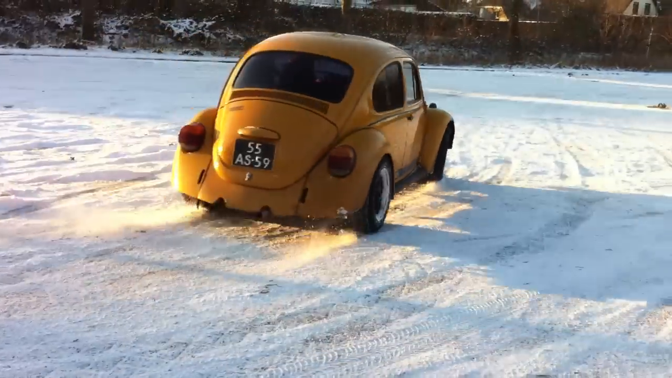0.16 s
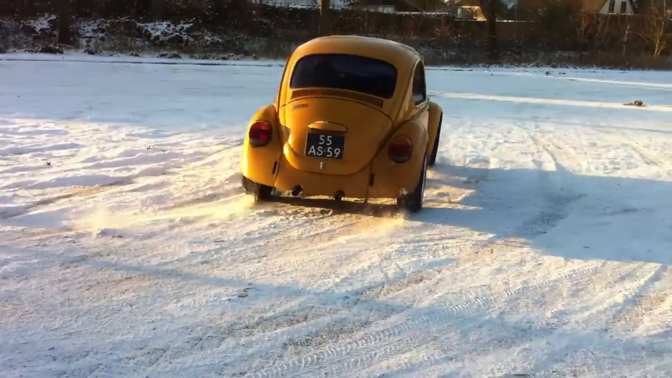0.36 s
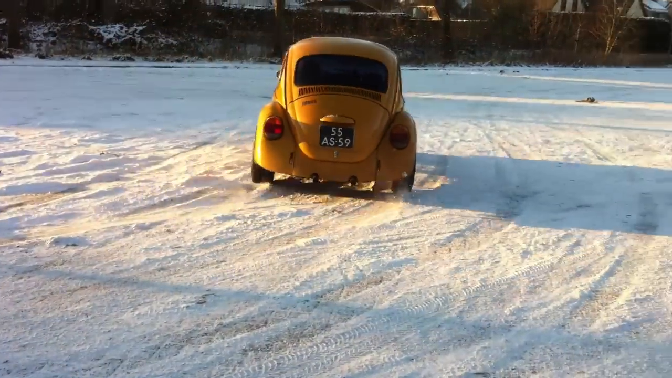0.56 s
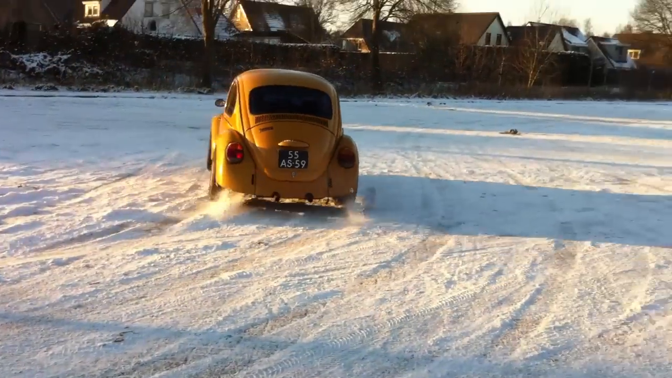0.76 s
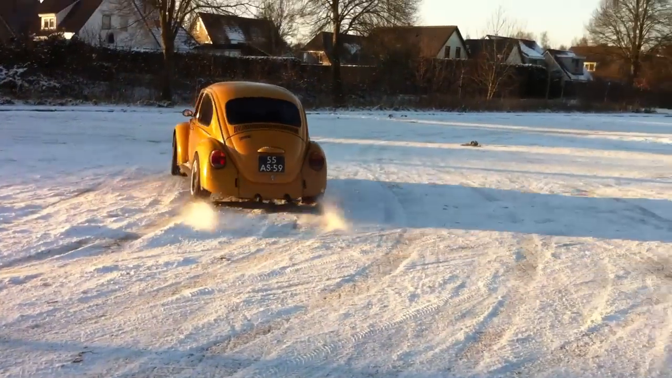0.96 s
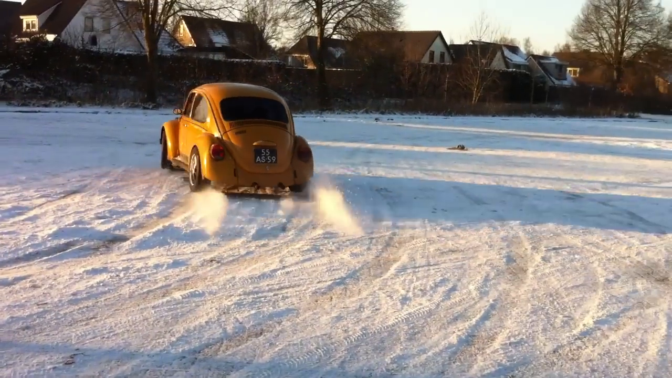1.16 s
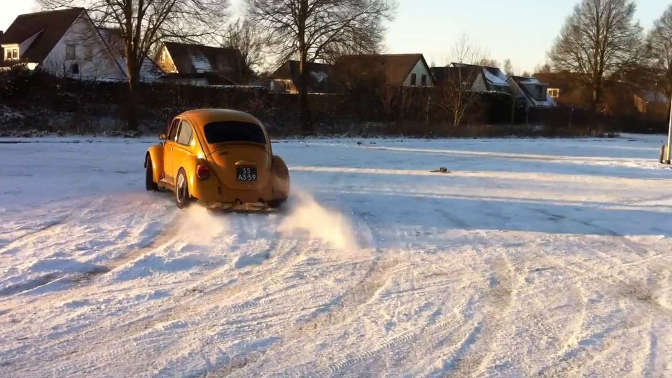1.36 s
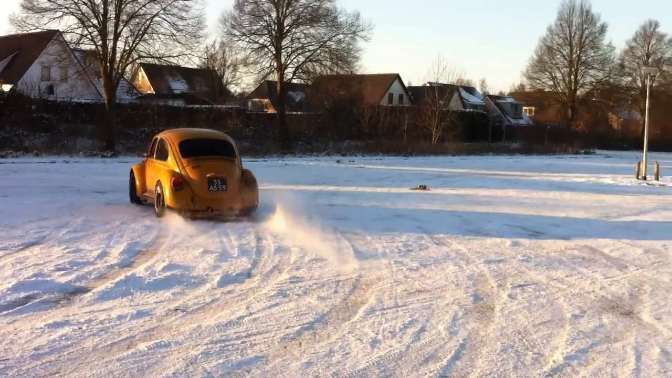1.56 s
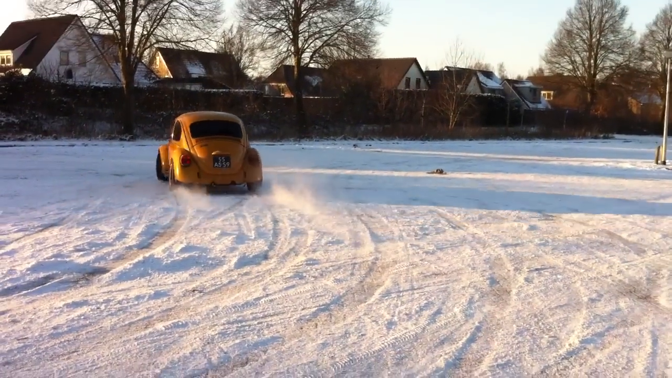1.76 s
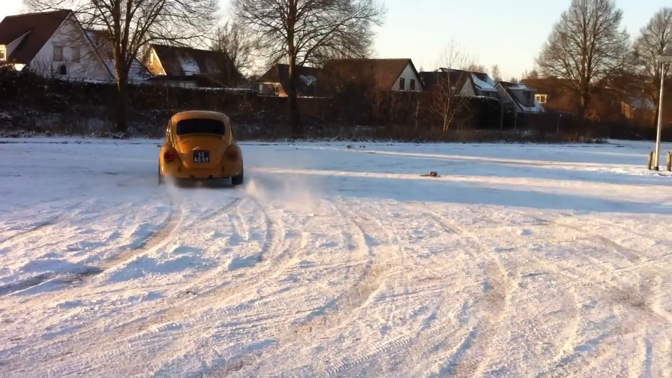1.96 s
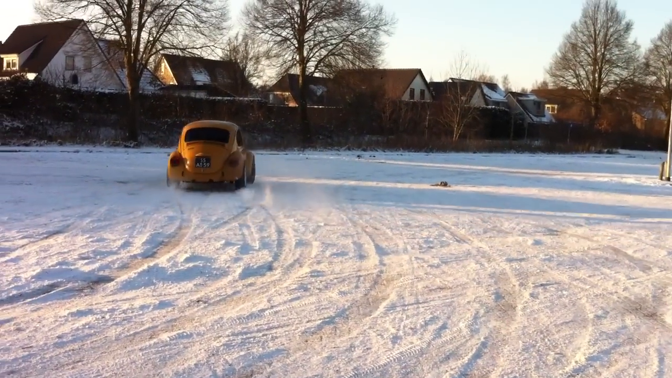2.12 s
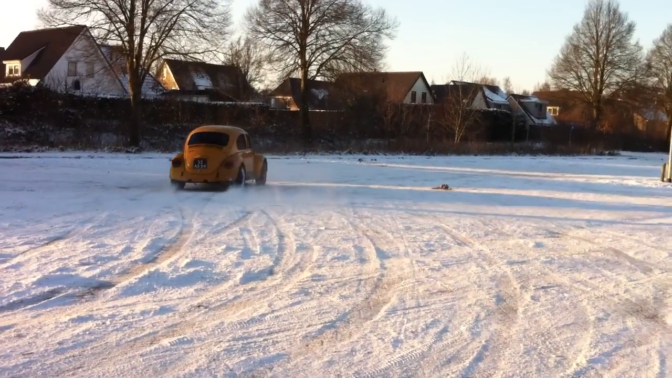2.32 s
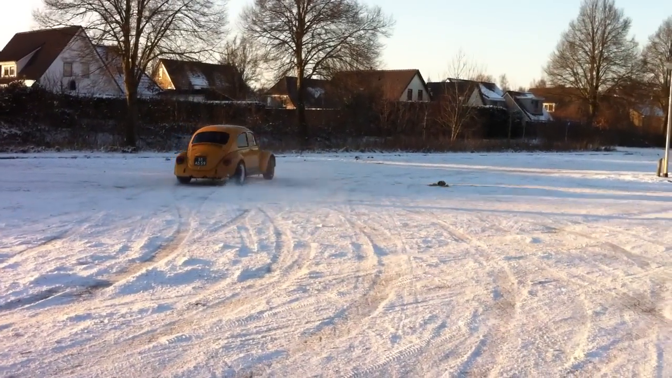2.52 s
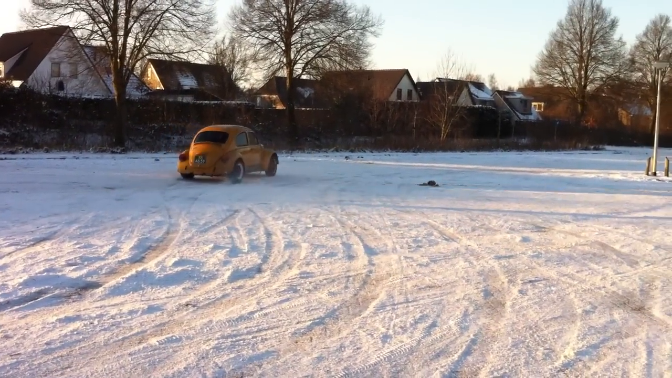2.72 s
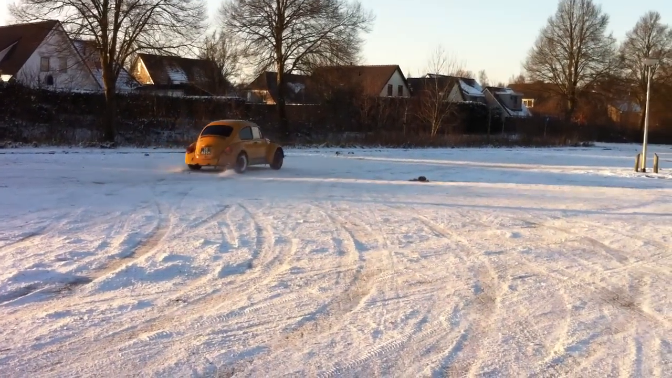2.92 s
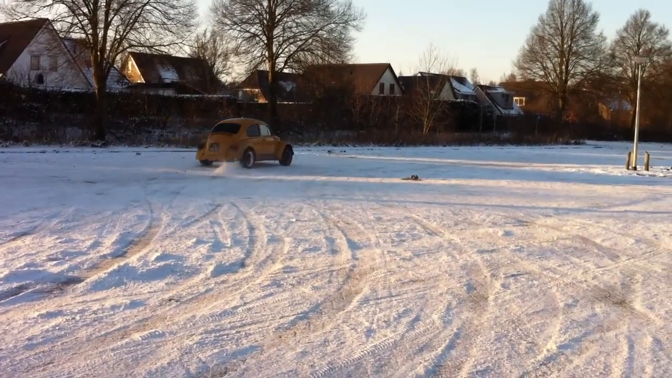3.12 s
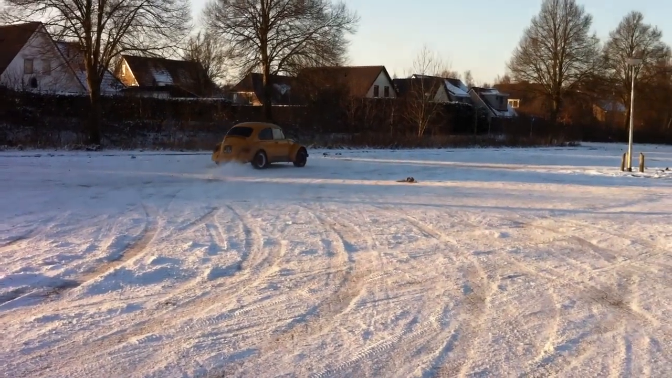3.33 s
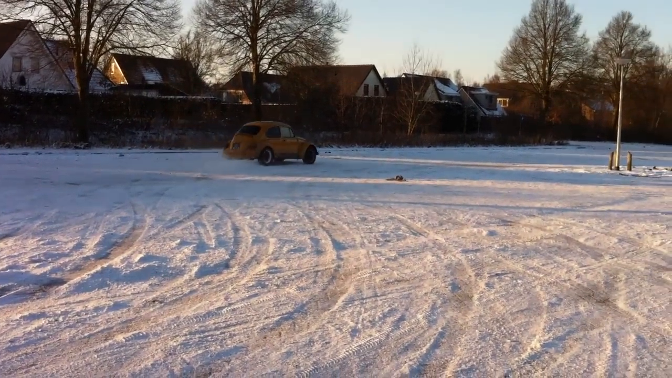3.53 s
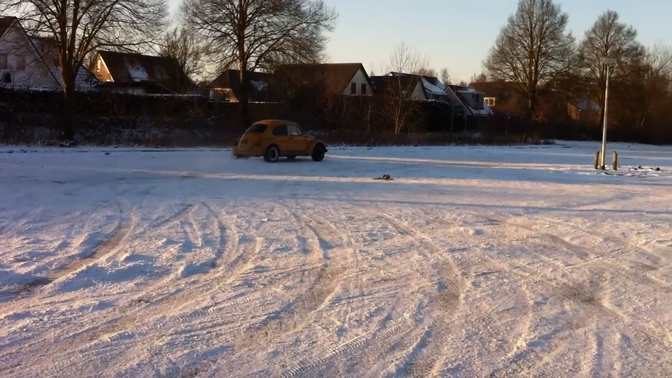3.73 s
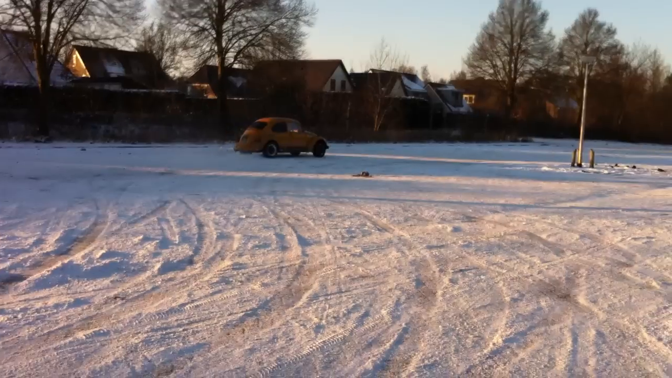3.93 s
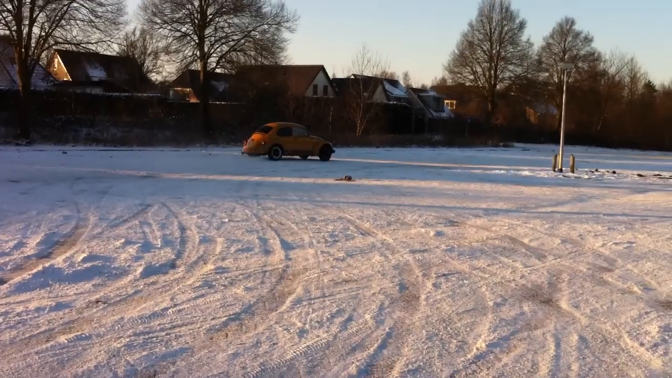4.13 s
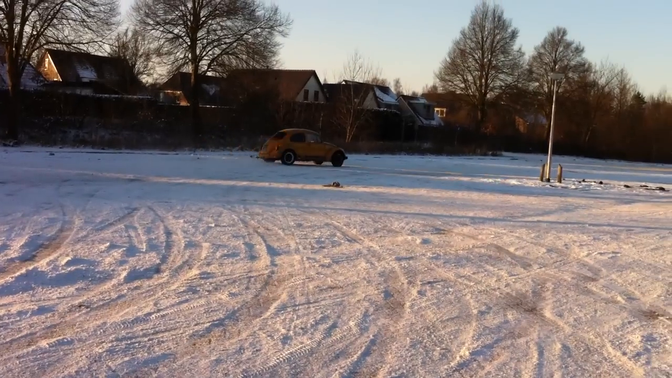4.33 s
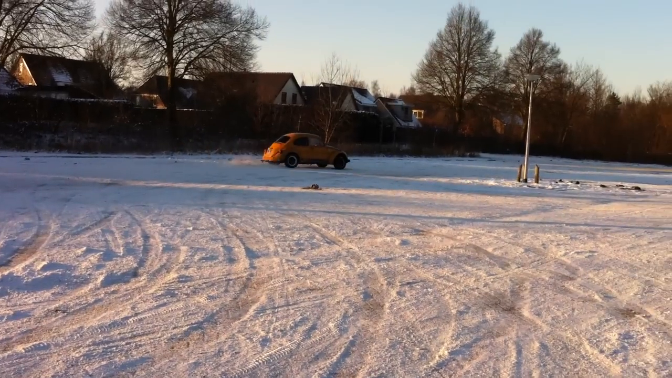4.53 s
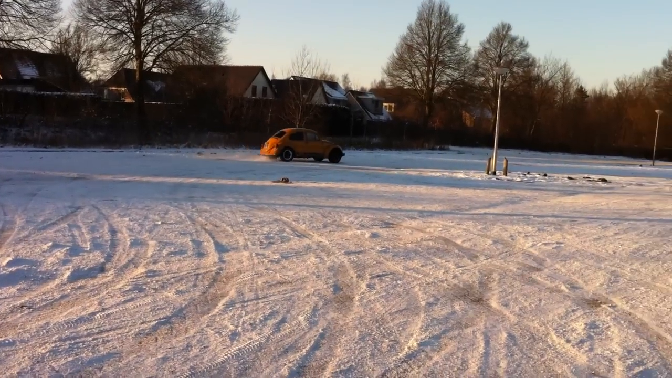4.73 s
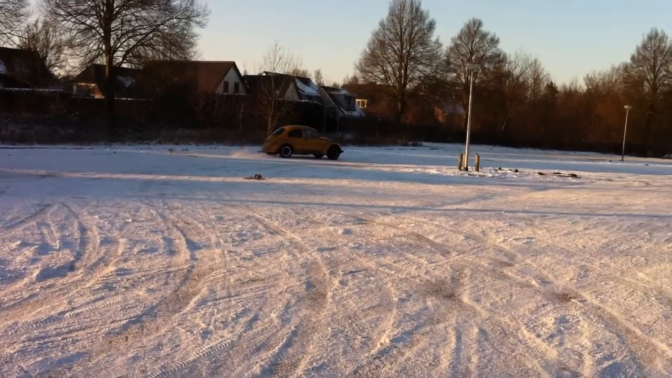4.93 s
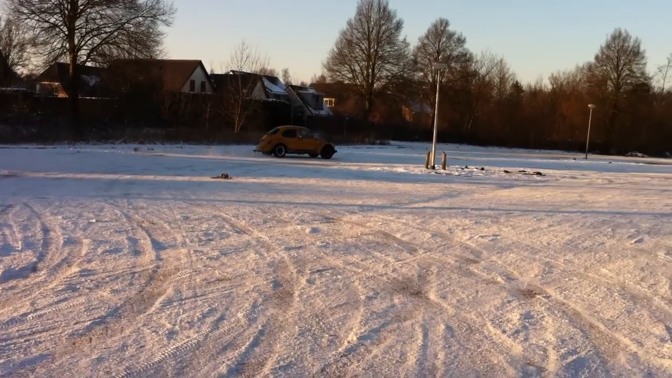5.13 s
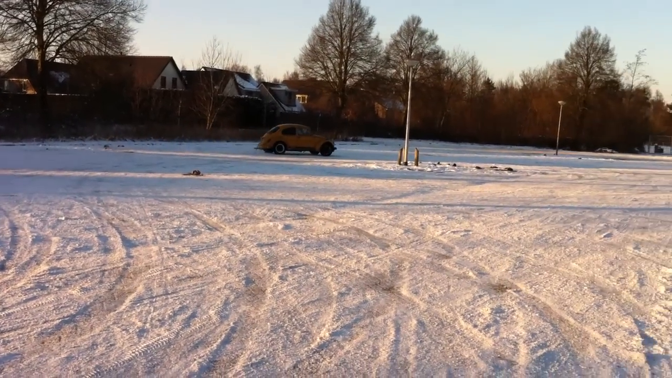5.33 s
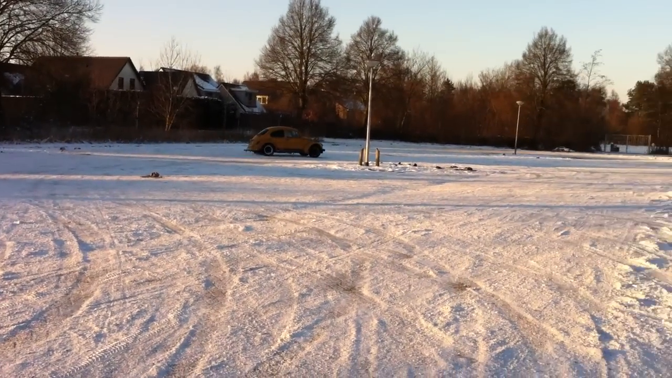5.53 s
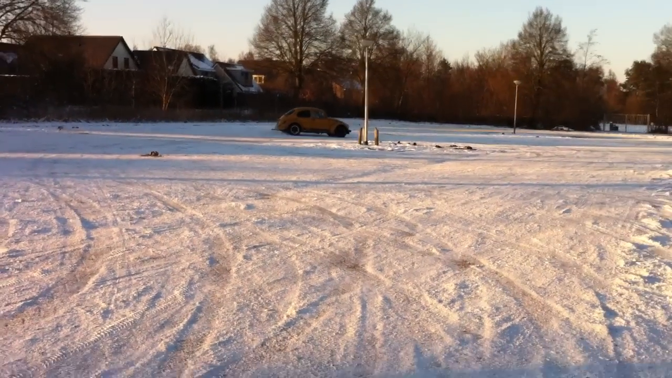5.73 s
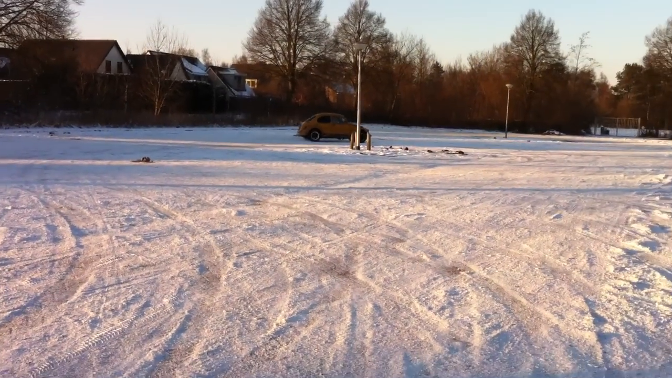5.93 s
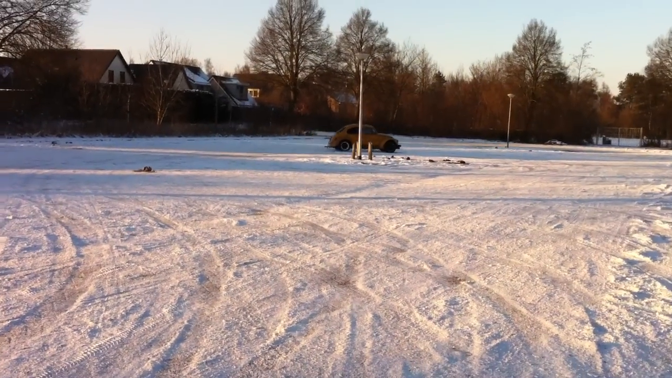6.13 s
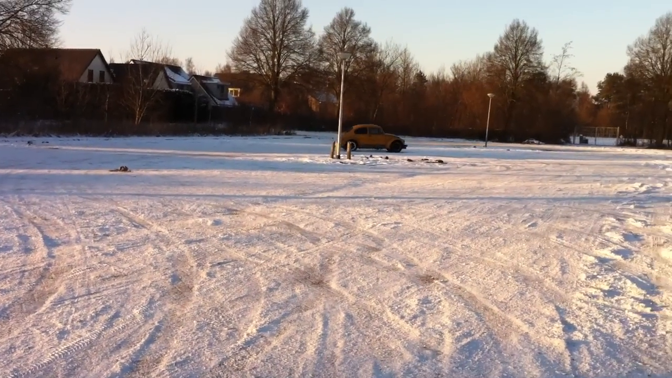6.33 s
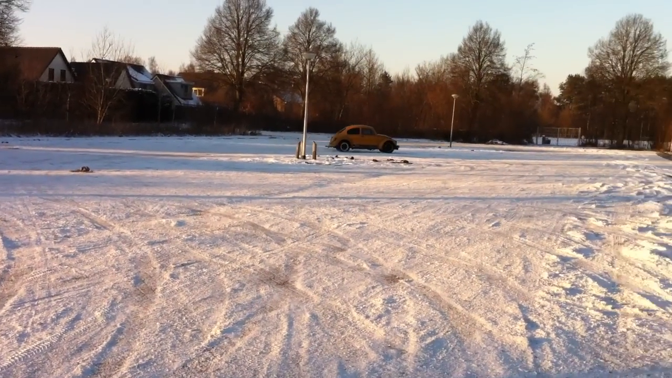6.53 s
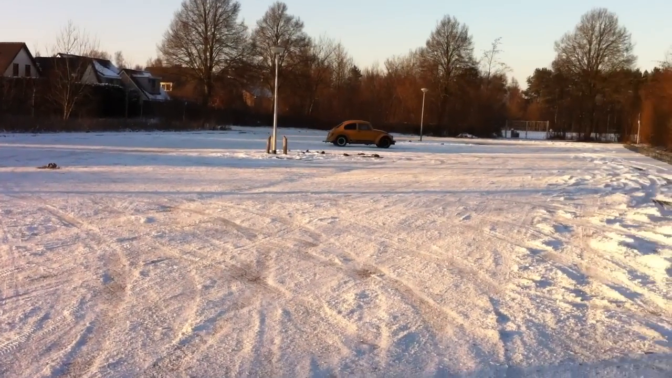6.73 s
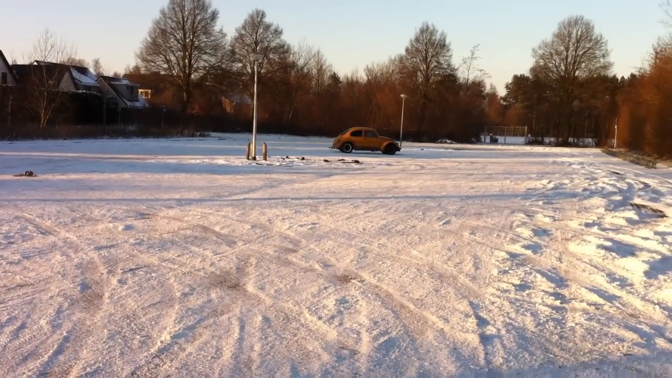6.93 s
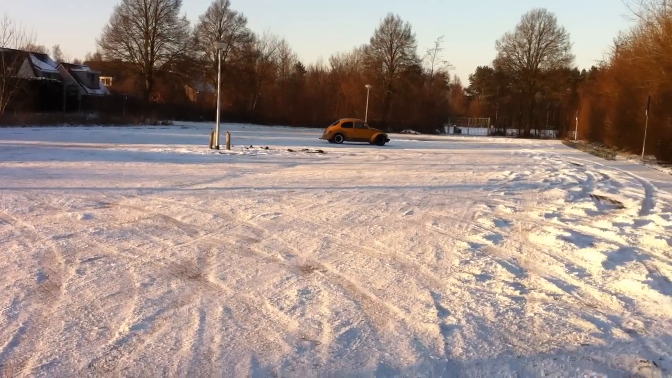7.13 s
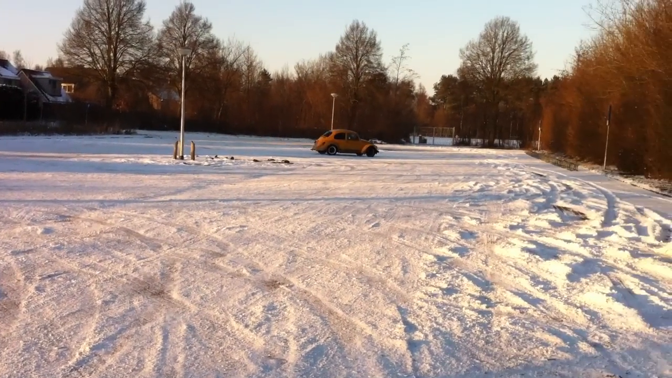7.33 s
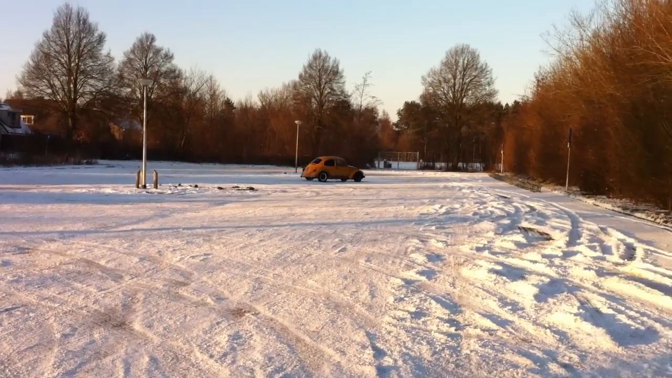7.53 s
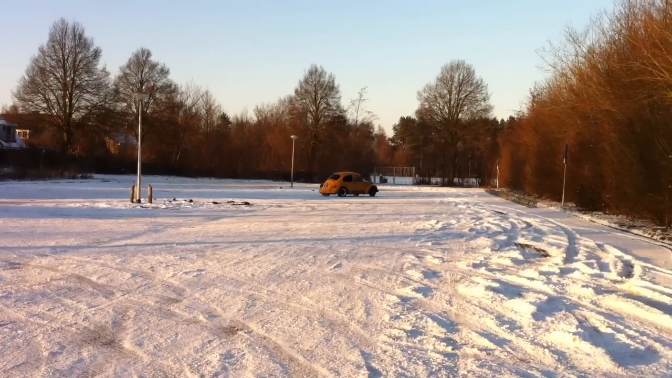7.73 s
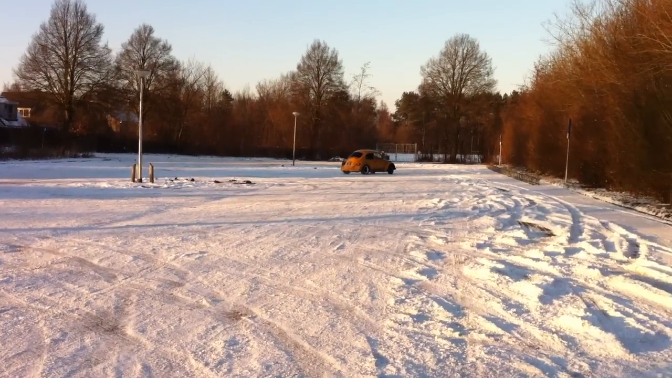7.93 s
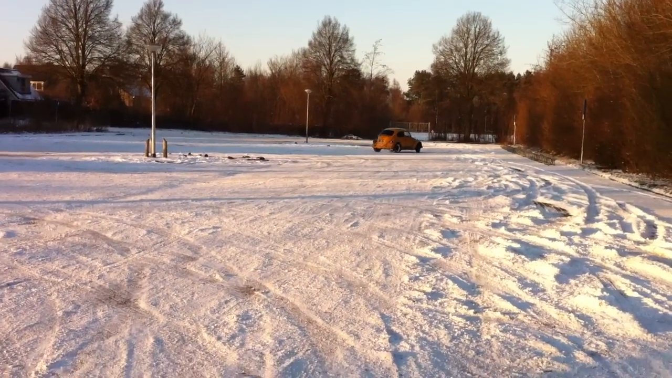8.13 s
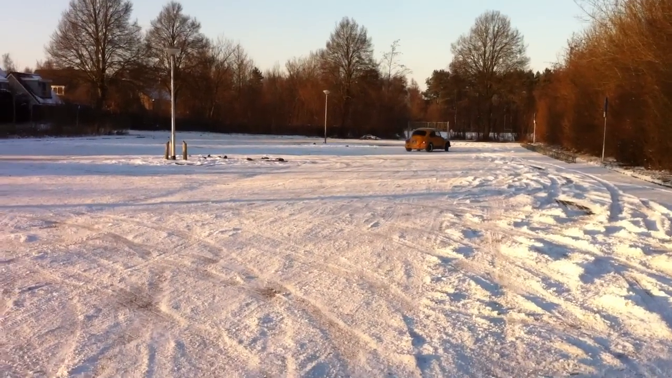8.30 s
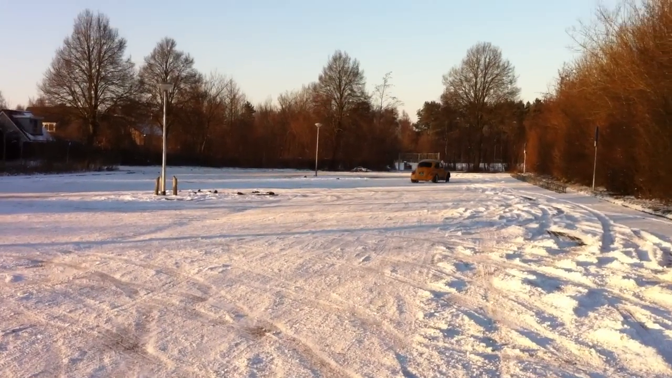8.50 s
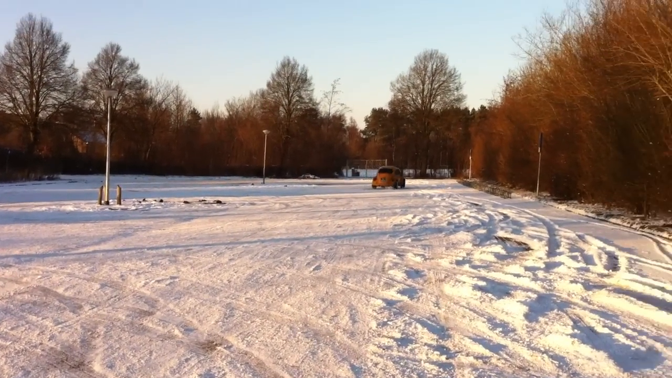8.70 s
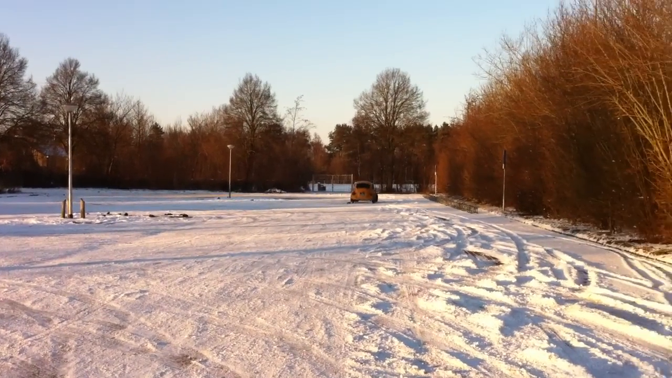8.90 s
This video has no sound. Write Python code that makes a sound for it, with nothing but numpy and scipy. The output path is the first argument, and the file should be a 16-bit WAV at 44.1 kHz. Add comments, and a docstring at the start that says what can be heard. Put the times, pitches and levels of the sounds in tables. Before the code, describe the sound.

An old air-cooled four-cylinder car begins very close, bright snow-tearing tyre noise fading within the first second as its revs fall. At about 0.7 s an intake gulp starts a raspy surge, held until 1.3; the revs dip and surge again from 1.5 to 2.1 with sharp exhaust cracks near 1.6. They sink to a low, lumpy beat around 2.7, then climb hard to 3.6. A lift burbles at 3.8, a blip peaks at 4.3, another burble follows, and a longer pull peaks near 5.5. Now distant and duller, the engine slides down from 6 to a faint low purr by 6.8. Close knocks sound at 7.15, 7.3 and 8.1, with small rustles and faint metallic valve ticks at 8.2-8.6. From 8.6 it revs up again amid snow swish, thin whistling bands and rustles, ending mid-rise at 9. Faint echoes from walls, soft air hiss throughout.

```python
"""An old air-cooled flat-four car starts close by, its tyres tearing snow, and slides away over a snowy car park.
It revs up and down: exhaust orders hum, gas noise rasps, clatters and spits at each firing, and walls echo it.
Early on the intake gulps as the foot goes down, single firings crack and lifting the foot burbles in the pipe.
Farther off it drops to low revs; snow swish and whistling bands come and go, damped rings knock and noise
rustles near the phone, faint engine valve ticks ring and the car revs up again. Air hisses throughout."""
import sys
import numpy as np
from scipy import signal
from scipy.fft import rfft, irfft, next_fast_len
from scipy.io import wavfile
from scipy.ndimage import uniform_filter1d

SR = 44100
rng = np.random.default_rng(int(sys.argv[2]) if len(sys.argv) > 2 else 0)


def convert_level_to_amplitude(level_db):
    """Map a level in decibels to its linear amplitude factor."""
    exponent = np.asarray(level_db, float) / 20
    return 10 ** exponent


def store_wav(level_fs):
    """Save 16-bit WAV to argv[1]."""
    pcm = np.round(np.clip(np.atleast_2d(level_fs), -1, 1) * 32767)
    wavfile.write(sys.argv[1], SR, pcm.T.astype(np.int16))


N = 399546
T = np.arange(N) / SR
STEP = 64  # samples between control points
TC = T[::STEP]
NEAR_M, MID_HZ = 10, 100  # distance and firing rate at which the layer levels hold


def on_log(table, hz):
    """Read a (Hz, dB) table on a log-frequency axis."""
    f, db = np.transpose(table)
    return np.interp(np.log(np.maximum(hz, 1)), np.log(f), db)


def fine(control):
    """Interpolate control points to samples."""
    return np.interp(T, TC, control)


def colour(x, table):
    """Give a sound the table's spectrum, falling away steeply outside it; rms 1."""
    size = next_fast_len(N)
    edged = [(table[0][0] / 2, -90)] + list(table) + [(table[-1][0] * 1.15, -90)]
    gain = convert_level_to_amplitude(on_log(edged, np.fft.rfftfreq(size, 1 / SR)))
    y = irfft(rfft(x, size) * gain, size)[:N]
    return y / np.sqrt(np.mean(y ** 2))


def coloured_noise(table):
    """Steady noise with the table's spectrum; rms 1."""
    return colour(rng.standard_normal(N), table)


def walk(rate):
    """Random levels held 1 / rate s and slewed twice, on the control points; spread near 1."""
    k = max(int(SR / STEP / rate), 1)
    held = np.repeat(rng.standard_normal(len(TC)), k)[:len(TC)]
    return 1.3 * uniform_filter1d(uniform_filter1d(held, k), k)


def lingering(x, fade_s):
    """Rises of a control, summed and dying away exponentially."""
    return signal.lfilter([1], [1, -np.exp(-STEP / SR / fade_s)], np.maximum(x, 0))


# the driver's foot: start_s, firing_rate_hz, throttle (0-1)
DRIVE = [(0.0, 137.2, 0.36), (0.06, 131.4, 0.04), (0.219, 116.7, 0.08), (0.5, 100.5, 0.23),
         (0.614, 95.6, 0.17), (0.68, 99.7, 0.57), (0.745, 105.9, 0.71), (0.81, 107.5, 0.67),
         (0.95, 104.6, 0.8), (1.238, 106.3, 0.95), (1.311, 104.2, 0.19), (1.371, 90.3, 0.15),
         (1.44, 89.1, 0.45), (1.552, 84.7, 0.69), (1.649, 88.9, 0.99), (1.949, 98.5, 0.86),
         (2.1, 105.0, 0.88), (2.179, 104.2, 0.4), (2.35, 85.7, 0.33), (2.569, 65.4, 0.27), (2.7, 61.3, 0.3),
         (2.79, 63.3, 0.06), (2.835, 66.8, 0.62), (2.872, 69.7, 0.66), (3.149, 85.3, 0.97),
         (3.45, 107.4, 1.0), (3.6, 117.2, 0.7), (3.691, 116.8, 0.6), (3.725, 114.3, 0.15),
         (3.76, 111.7, 0.08), (3.85, 100.0, 0.03), (3.9, 96.4, 0.5), (3.97, 101.0, 0.79),
         (4.289, 117.2, 0.8), (4.325, 113.8, 0.36), (4.36, 110.4, 0.3), (4.54, 87.8, 0.18),
         (4.63, 90.4, 0.63), (5.1, 108.8, 0.66), (5.45, 118.6, 0.92), (5.55, 119.3, 0.86),
         (5.7, 116.0, 0.59), (5.999, 109.8, 0.6), (6.06, 110.1, 0.6), (6.08, 110.2, 0.36),
         (6.16, 100.1, 0.36), (6.532, 73.3, 0.15), (6.751, 67.6, 0.01), (7.0, 66.2, 0.04),
         (7.25, 70.4, 0.26), (7.5, 67.7, 0.02), (7.75, 70.3, 0.2), (8.251, 70.8, 0.18), (8.55, 73.9, 0.35),
         (8.65, 81.0, 0.85), (9.06, 103.4, 0.71)]
# the slide: start_s, distance_m, aim (tailpipes at the phone, 0-1), flank (side shown, 0-1)
PATH = [(0, 5.17, 0.76, 0.36), (0.599, 7.2, 0.39, 0.32), (1.241, 8.9, 0.84, 0.4), (1.8, 11.6, 0.5, 0.49),
        (2.4, 15.3, 0.27, 0.6), (2.9, 17.6, 0.93, 0.75), (3.5, 21.2, 0.86, 0.68), (4.3, 24.4, 0.78, 0.58),
        (5.5, 39.5, 0.72, 1), (6, 43.4, 0.58, 0.7), (6.5, 42, 0.17, 0.45), (7.5, 43, 0.2, 0.7),
        (8.3, 48, 0.36, 0.8), (9.06, 41, 0.2, 0.56)]


def controls():
    """Revs, throttle, fading traces of lifting and pressing the foot, distance, aim and flank."""
    s, hz, throttle = np.transpose(DRIVE)
    hz = np.interp(TC, s, hz)
    throttle = np.clip(np.interp(TC, s, throttle), 0, 1.2)
    change = np.diff(throttle, prepend=throttle[0])
    lift = lingering(-change, fade_s=0.11)
    press = lingering(change, fade_s=0.036)
    s, *path = np.transpose(PATH)
    return hz, throttle, lift, press, *(np.interp(TC, s, column) for column in path)


# how each layer answers: shut_db (throttle shut), opened_db (gained at throttle 1), revs_db (per octave),
# burble_db (per unit of throttle lifted), tail_db (gained tail-on), far_db (lost per doubled distance)
LAYERS = {"first": (-26.5, -3, 0, 2.5, -2.5, 6.5), "second": (-40.5, 18.5, 11.5, 6, -5.5, 6),
          "third": (-38.5, 11.5, 1.5, -18, -2, 6), "half": (-35.5, 6, 14.5, -27, -3.5, 4),
          "quarter": (-42, 0.5, 13.5, 10, 2.5, 5), "rasp": (-38.5, 3, 10, -3, -0.5, 5.5),
          "clatter": (-40, 8, 10, 1, 0.5, 8.5), "spit": (-53.5, 6.5, 7, -9, 14.5, 7)}
# gained flank-on, where the two tailpipes no longer add in step: layer to gain_db
FLANK_DB = {"second": 0.5, "half": -3, "quarter": 4, "rasp": 3, "first": -1.8, "third": -2.5}


def layer_levels(octaves, throttle, lift, aim, doublings, flank):
    """Each layer's level in dB follows load, revs, aim and distance."""
    levels = {}
    for name, (shut, opened, revs, burble, tail, far) in LAYERS.items():
        engine = shut + opened * throttle + revs * octaves + burble * lift
        levels[name] = engine + tail * aim - far * doublings + FLANK_DB.get(name, 0) * flank
    return levels


# how pipe and microphone pass the firing tones: pitch_hz, level_db
FIRING_PIPE = [(60, -29), (90, -8), (125, 1.5), (160, 3), (210, 2.5), (265, 1.5), (310, -4.5), (340, -11),
               (400, -30)]


def firing_levels(db, hz, press):
    """The pipe weights the firing rate and its multiples; the lowest dips as the foot goes down."""
    whole_db = [db[name] + on_log(FIRING_PIPE, hz * (k + 1)) for k, name in enumerate(("first", "second", "third"))]
    stumble_db = -37  # dB per unit of throttle pressed
    whole_db[0] = whole_db[0] + stumble_db * press
    return whole_db


# how pipe and microphone pass the in-between tones: pitch_hz, level_db
PIPE = [(45, -15), (80, -12), (102, -16), (125, -8), (160, 0), (220, 2.5), (280, -4), (330, -12),
        (450, -8.5), (650, -23)]
# what the pipe branches favour: order (quarters of the firing rate) to gain_db
FAVOUR_DB = {3: -10, 5: -3, 7: 3, 9: 1, 10: -2, 11: -2, 13: 5, 14: -5, 15: -4, 16: -12, 17: -4, 18: -2, 19:
             -6, 20: -22}
# added in proportion as the throttle shuts: order to gain_db
SHUT_FAVOUR_DB = {5: -4, 7: -13, 9: -8, 11: -5, 13: -15, 15: -7}
# added under load and high revs once the car is far, some orders weaker, one stronger: order to gain_db
FAR_FAVOUR_DB = {6: -8, 7: -4, 9: 5, 10: -10}


def exhaust_tones(turns, hz, whole_db, half_db, quarter_db, tilt_db, shut, far):
    """Multiples of the four-firing cycle: firing orders stand out, unequal cylinders fill in between."""
    def share_of(k, family):
        """How the pipe weights order k against the strongest orders of its family."""
        mean_power = np.mean([convert_level_to_amplitude(2 * on_log(PIPE, hz * j / 4)) for j in family], axis=0)
        return on_log(PIPE, hz * k / 4) - 10 * np.log10(mean_power)

    out, start = 0, rng.uniform(0, 2 * np.pi, 25)
    # the orders either side of the strongest miss lining up by 2.2 rad, so it flutters rather than thumps
    start[9] = -.38 * 16 - start[7] + 2.2
    tilt = {6: -tilt_db, 10: tilt_db, 18: tilt_db}
    for k in range(3, 21):
        whole = k in (4, 8, 12)
        favour_db = FAVOUR_DB.get(k, 0) + FAR_FAVOUR_DB.get(k, 0) * far
        if whole:
            db, phase = whole_db[k // 4 - 1], -.38 * k  # crests line up with the puffs
        elif k % 2:
            db = quarter_db + favour_db + SHUT_FAVOUR_DB.get(k, 0) * shut + share_of(k, (7, 9, 11))
            phase = start[k]
        else:
            db = half_db + favour_db + tilt.get(k, 0) + share_of(k, (6, 10))
            phase = start[k]
        # no two cycles are alike, so weak orders waver more in size and phase; size most at low revs
        waver_db = (.7 if whole else 1.4) * MID_HZ / hz * (walk(5) + .7 * walk(16))
        slip = (.08 if whole else .22) * walk(8)
        tone = np.cos(2 * np.pi * turns * k / 4 + phase + fine(slip))
        out = out + fine(convert_level_to_amplitude(db + waver_db)) * np.sqrt(2) * tone
    return out


# colour of the high orders: pitch_hz, level_db
GROWL = [(330, -8), (450, 0), (540, -5), (640, -2), (750, 0), (880, 3), (960, -2), (1080, -14)]


def growl(turns, hz, rasp_db, throttle):
    """High orders of the four-firing cycle glide with the revs through the pipe's colour and waver."""
    out, start = 0, rng.uniform(0, 2 * np.pi, 60)
    for k in range(14, 44):
        level = convert_level_to_amplitude(on_log(GROWL, hz * k / 4) + 4 * walk(12))
        phase = start[k] + fine(1.2 * walk(16))
        out = out + fine(level) * np.sqrt(2) * np.cos(2 * np.pi * turns * k / 4 + phase)
    return fine(convert_level_to_amplitude(rasp_db - 21 + 3 * throttle)) * out


# puffed share of the gas noise: shut, then scaled by throttle: opened, lost per octave of revs,
# gained tail-on, lost per doubled distance
PUFFS = (0.085, 0.17, 0.56, 0.54, 0.027)


def puff_share(throttle, octaves, aim, doublings):
    """Load and aim set how much of the gas comes in puffs rather than an even rush."""
    shut, opened, revs, tail, far = PUFFS
    return shut + throttle * (opened - revs * octaves + tail * aim - far * doublings)


# puff strength of the four cylinders in rasp, ring and burble: level_db
CYLINDERS_DB = [0, -3.5, -3, -3.5]


def gas(turns, share, length, colours, beat=0., cylinders_db=CYLINDERS_DB, second_db=0 * TC):
    """Even noise plus one fading puff per firing, length in firings; beat adds the firing's own crack."""
    count = turns.astype(int)
    firings = np.arange(count[-1] + 1)
    scatter_db = 2.3 * rng.standard_normal(len(firings))  # from firing to firing
    firing_db = np.array(cylinders_db)[firings % 4] + scatter_db
    size = convert_level_to_amplitude(firing_db[count] + (count % 4 == 1) * fine(second_db))
    phase = turns % 1
    puff = size * phase / length * np.exp(-phase / length)
    crack = size * (np.diff(count, prepend=count[0]) > 0)
    share = fine(np.clip(share, 0, 1))
    noise = rng.standard_normal((2, N))
    puffs = puff * noise[0] / np.sqrt(np.mean(puff ** 2)) + beat * crack / crack.std()
    puffs = puffs / np.sqrt(1 + beat ** 2)
    return colour(np.sqrt(share) * puffs + np.sqrt(1 - share) * noise[1], colours)


# colour of the rasp: pitch_hz, level_db (per Hz)
RASP = [(300, -2), (350, -6), (405, -0.5), (470, 3), (560, 2), (730, 3.5), (810, 1), (900, -9), (1080, -7)]


def rasp(turns, level_db, share):
    """Low-mid gas noise puffs and cracks with each firing."""
    return fine(convert_level_to_amplitude(level_db)) * gas(turns, .2 + .35 * share, .15, RASP, beat=1.1)


# tailpipe ring: pitch_hz, level_db (per Hz)
RING = [(760, -10), (830, -0.5), (890, 1), (950, -5.5), (1010, -16)]


def tailpipe_ring(turns, second_db, share):
    """Firings excite a fixed narrow band whose level follows the second firing tone and fades with time."""
    level_db = second_db - 2 - 5.5 * TC  # loses 5.5 dB a second
    return fine(convert_level_to_amplitude(level_db)) * gas(turns, .3 + .5 * share, .18, RING, beat=1.4)


# colour of the clatter: pitch_hz, level_db (per Hz)
CLATTER = [(640, -60), (1100, 3.5), (1190, 9), (1260, 9.5), (1400, 9.5), (1630, 2), (1820, 10), (2240, 6),
           (2430, 9.5), (3220, -2.5), (3510, -4), (3970, -7.5), (4300, -7), (5590, -46), (9460, -120)]
# one leaky joint barks once a cycle, strength of the four cylinders: level_db
BARK_DB = [0, -14, -14, -14]


def clatter(turns, level_db, throttle, flank):
    """Mid-band gas noise barks most on one cylinder, more under load and less flank-on."""
    share = (.58 - .4 * flank) * np.sqrt(throttle)
    return fine(convert_level_to_amplitude(level_db)) * gas(turns, share, .2, CLATTER, beat=.4, cylinders_db=BARK_DB)


# colours of spit, fizz and the narrow tailpipes' chirp: pitch_hz, level_db (per Hz)
SPIT = [(2350, -4), (4000, -9), (4370, -2), (4860, 8), (5300, 6.5), (6190, 6), (6520, 4), (6780, 6.5),
        (7740, -6), (8300, 4), (10800, -11.5), (18300, -120)]
FIZZ = [(4820, -62), (8200, -9), (8940, 3), (10400, 6), (11400, 1), (12800, 6), (13700, 1.5),
        (15600, -12.5)]
CHIRP = [(4900, -14), (5250, -2), (5600, -14), (6200, 0), (6700, -12), (7200, -12), (7700, -1), (8200, -16)]
# spit strength of the four cylinders: level_db
SPIT_CYLINDERS_DB = [0, -4, -4.5, -4.5]


def spit(turns, level_db, share, octaves, flank):
    """Treble gas puffs through the tailpipes in three bands; the second cylinder gains at low revs."""
    lug_db = 10 * np.clip(-octaves, 0, .5)  # 10 dB per octave under the middle revs
    cylinders = dict(cylinders_db=SPIT_CYLINDERS_DB, second_db=lug_db)
    out = fine(convert_level_to_amplitude(level_db)) * gas(turns, share, .12, SPIT, **cylinders)
    out += fine(convert_level_to_amplitude(level_db - 3)) * gas(turns, share, .11, FIZZ, **cylinders)
    chirp_db = level_db - 2.5 - 0.5 * (flank - .5)
    out += fine(convert_level_to_amplitude(chirp_db)) * gas(turns, .15 + share, .16, CHIRP, **cylinders)
    return out


# loud single firings: start_s, level_db (before the 5 dB cut)
CRACKS = [(1.6185, -17), (1.6628, -24), (2.8477, -26), (2.9325, -28), (3.1126, -28), (3.1595, -28),
          (3.3426, -20), (3.8803, -30), (3.9516, -25), (5.0497, -30)]
# their colour: pitch_hz, level_db (per Hz)
CRACK_COLOUR = [(700, -3), (2500, 4), (4000, -9), (6000, 11), (12000, -1)]


def cracks():
    """Sharp bursts of gas leave the tailpipes and decay quickly."""
    decay_s = 0.0049
    burst = sum(convert_level_to_amplitude(db) * (T >= s) * np.exp(-np.maximum(T - s, 0) / decay_s) for s, db in CRACKS)
    return burst * coloured_noise(CRACK_COLOUR) * convert_level_to_amplitude(-5)


# throaty burbles after the foot lifts: centre_s, length_s, level_db
BURBLES = [(3.762, 0.06, -38), (4.348, 0.065, -37.5), (5.538, 0.13, -44.5)]
# their colour: pitch_hz, level_db (per Hz)
BURBLE = [(400, 1), (650, 15), (900, 0), (1300, 12.5), (1700, -3)]


def burbles(turns):
    """Gas swells briefly in the pipe, half of it puffing with the firings."""
    swell = sum(convert_level_to_amplitude(db) * np.exp(-((TC - s) / length) ** 2) for s, length, db in BURBLES)
    return fine(swell) * gas(turns, 0 * TC + .5, 0.7, BURBLE, beat=0.41)


# hollow intake gulps as the foot goes down: centre_s, length_s, pitch_hz, level_db
GULPS = [(0.655, 0.025, 148, -26.5), (1.41, 0.03, 150, -34), (3.895, 0.022, 152, -34.5)]


def gulps():
    """Short swelling low tones from the intake."""
    out = 0
    for s, length, hz, db in GULPS:
        swell = convert_level_to_amplitude(db) * np.sqrt(2) * np.exp(-((T - s) / length) ** 2)
        out = out + swell * np.sin(2 * np.pi * hz * (T - s))
    return out


# colour of the rumble: pitch_hz, level_db (per Hz)
RUMBLE = [(20, -22), (60, -25), (100, -14), (200, -5.5), (300, -6.5), (420, -69)]


def rumble(quarter_db):
    """Low noise moves with the in-between exhaust orders."""
    return fine(convert_level_to_amplitude(quarter_db - 5)) * coloured_noise(RUMBLE)


# tyres tearing snow close by: pitch_hz, level_db (per Hz)
SNOW = [(1500, -9), (2500, -1), (3400, -5), (4200, -16.5)]


def snow_tear():
    """Bright tyre noise fades as the car leaves."""
    return convert_level_to_amplitude(-25 - 33.5 * T) * coloured_noise(SNOW)  # loses 33.5 dB a second


# tyres swishing through far snow: start_s, level_db
SWISH = [(6.2, -73), (7.4, -62.5), (8.2, -69), (8.45, -55.5), (9.06, -49.5)]
# its colour: pitch_hz, level_db (per Hz)
SWISH_COLOUR = [(1200, 4), (1800, -7), (2500, -6.5), (3500, -5.5), (4500, -5), (6000, -10), (12000, -11.5)]


def snow_swish():
    """Wide-band tyre noise swells and wavers slightly."""
    level_db = np.interp(TC, *np.transpose(SWISH), left=-120) + 0.67 * walk(8)
    return fine(convert_level_to_amplitude(level_db)) * coloured_noise(SWISH_COLOUR)


# delayed answers of houses and trees: delay_s, level_db
ECHOES = [(.083, -17.5), (.17, -19.5)]


def echoes(car):
    """Snow-laden walls and trees send back delayed copies with little treble."""
    dull = signal.lfilter(*signal.butter(2, 2500, fs=SR), car)
    return sum(convert_level_to_amplitude(db) * np.pad(dull, (int(delay * SR), 0))[:N] for delay, db in ECHOES)


# narrow bands in the far rush, a table for each: start_s, pitch_hz, level_db
WHISTLES = [
    [(6.5, 2290, -91), (7.4, 2300, -65.5), (8.3, 2310, -85), (8.5, 2290, -65), (8.56, 2310, -57),
     (8.62, 2300, -80), (8.851, 2300, -55), (9.06, 2330, -50)],
    [(8.3, 1570, -78), (8.35, 1610, -57), (8.47, 1790, -57), (8.53, 1850, -82)],
    [(8.5, 4250, -85), (8.57, 4380, -63), (8.68, 4560, -63), (8.75, 4620, -93)],
]


def whistles():
    """Narrow bands of fluttering noise slide in pitch."""
    out = 0
    for table in WHISTLES:
        s, hz, db = np.transpose(table)
        turn = np.exp(2j * np.pi * np.cumsum(np.interp(T, s, hz)) / SR)
        flutter = (walk(330) + 1j * walk(330)) * convert_level_to_amplitude(2.3 * walk(25))
        out = out + convert_level_to_amplitude(np.interp(T, s, db, left=-120, right=-120)) * (fine(flutter) * turn).real
    return out


# knocks near the phone, a row for each ring: start_s, level_db, pitch_hz, t60_s
KNOCKS = [(7.1505, -30, 682, 0.11), (7.1502, -23.5, 590, 0.02), (7.1509, -30, 400, 0.06),
          (7.1512, -25, 265, 0.05), (7.152, -33, 860, 0.022), (7.1505, -38, 1170, 0.023),
          (7.3041, -26.5, 2150, 0.0042), (8.0904, -19.5, 4130, 0.0028), (8.0904, -22, 5500, 0.003),
          (8.0914, -31, 7300, 0.002), (8.09, -32, 1100, 0.0043), (8.09, -30, 9970, 0.0018)]
# faint crisp engine valve ticks: start_s, level_db
TICKS = [(8.2141, -52), (8.241, -56), (8.2699, -48), (8.298, -54), (8.3258, -50), (8.3807, -56),
         (8.5483, -54), (8.6037, -55), (8.637, -57)]
# what the ticks ring with: pitch_hz, level_db, t60_s
TICK_MODES = [(4420, -7, .02), (5400, -2, 0.027), (7140, 0, 0.018), (8000, 2, 0.017)]


def knocks_and_ticks():
    """Damped rings swell over their first half cycle; the valve ticks' modes mix anew each time."""
    rings = list(KNOCKS)
    for s, db in TICKS:
        for hz, mode_db, t60 in TICK_MODES:
            rings.append((s, db + mode_db + 3 * rng.standard_normal(), hz, t60))
    out = np.zeros(N)
    for s, db, hz, t60 in rings:
        first = int(s * SR) + 1
        t = T[first:first + int(2 * t60 * SR)] - s
        envelope = np.minimum(2 * hz * t, 1) * np.exp(-np.log(1000) * t / t60)
        out[first:first + len(t)] -= convert_level_to_amplitude(db) * envelope * np.sin(2 * np.pi * hz * t)
    return out


# rustles near the phone: centre_s, length_s, level_db
RUSTLES = [(7.813, 0.021, -54), (7.845, 0.015, -52), (7.883, 0.012, -50.5), (8.06, 0.12, -54),
           (8.786, 0.031, -39.5), (8.98, 0.049, -41.5)]


def rustles():
    """Brief wide-band scuffs of grainy noise."""
    swell = sum(convert_level_to_amplitude(db) * np.exp(-((TC - s) / length) ** 2 * 2) for s, length, db in RUSTLES)
    grains = rng.standard_normal(N) * fine(convert_level_to_amplitude(1.8 * walk(300)))
    return fine(swell) * colour(grains, [(600, 5.5), (2000, -3.0), (6000, -14.0), (15000, -17)])


# still winter air and microphone hiss: pitch_hz, level_db (per Hz)
AIR = [(12, -56), (20, -28), (60, -19), (176, -2), (363, -18), (728, -16), (935, -27), (15600, -43)]


def still_air():
    """Steady faint noise, mostly low."""
    return convert_level_to_amplitude(-62) * coloured_noise(AIR)


def scene():
    """The car and its echoes over still air, knocks and rustles close to the phone, faint engine valve ticks."""
    hz, throttle, lift, press, metres, aim, flank = controls()
    octaves, doublings = np.log2(hz / MID_HZ), np.log2(metres / NEAR_M)
    db = layer_levels(octaves, throttle, lift, aim, doublings, flank)
    whole_db = firing_levels(db, hz, press)
    share = puff_share(throttle, octaves, aim, doublings)
    turns = 2.15 + np.cumsum(fine(hz)) / SR  # firings gone by
    clump_db = walk(22)  # gas comes in uneven clumps a few firings long
    spit_db = db["spit"] + clump_db + walk(18)  # the treble flickers at random
    # load lifts the upper half-order tones and lowers the lowest; flank-on reverses it
    tilt_db = -1 + (12 - 14 * flank) * throttle
    far = np.clip(doublings - .8, 0, 1) * throttle * np.clip(hz / MID_HZ, 0, 1) ** 2

    car = exhaust_tones(turns, hz, whole_db, db["half"], db["quarter"], tilt_db, 1 - throttle, far)
    car += rumble(db["quarter"])
    car += rasp(turns, db["rasp"] + clump_db, share)
    car += tailpipe_ring(turns, whole_db[1], share)
    car += clatter(turns, db["clatter"], throttle, flank)
    car += growl(turns, hz, db["rasp"], throttle)
    car += spit(turns, spit_db, share, octaves, flank)
    car += snow_tear()
    car += burbles(turns)
    car += snow_swish()
    car += cracks() + gulps()
    air = still_air()
    return (car + echoes(car) + air + whistles() + knocks_and_ticks() + rustles())[None]


def top_cut(x):
    """Nothing passes above the cut-off."""
    return signal.sosfilt(signal.butter(12, 15740, fs=SR, output="sos"), x)


def record(dry):
    """The finished mix as the phone keeps it."""
    return top_cut(dry)


dry = scene()
out = record(dry)
store_wav(out)
```